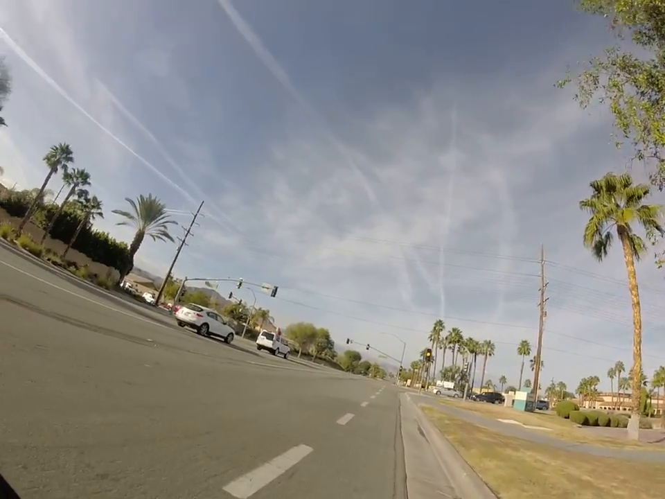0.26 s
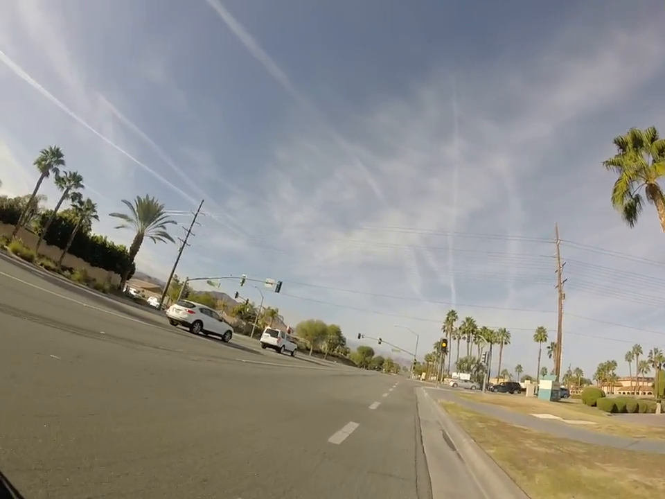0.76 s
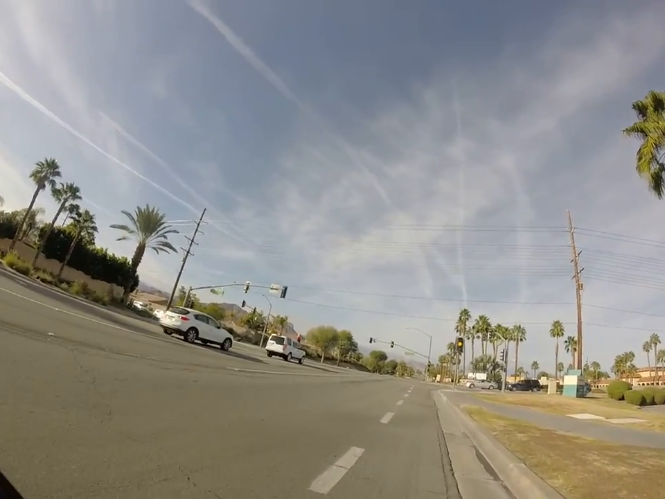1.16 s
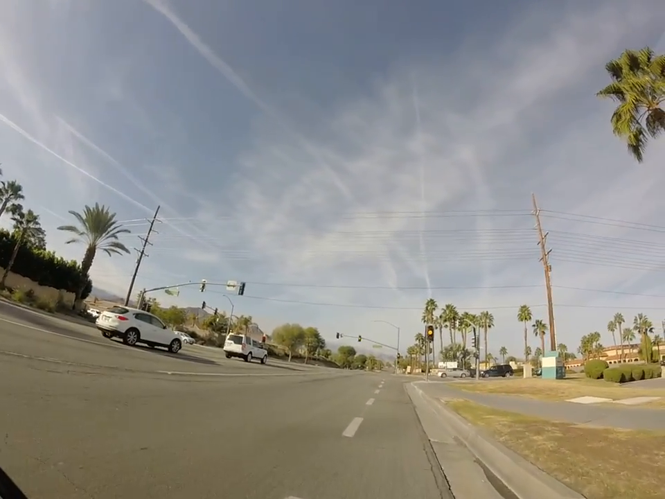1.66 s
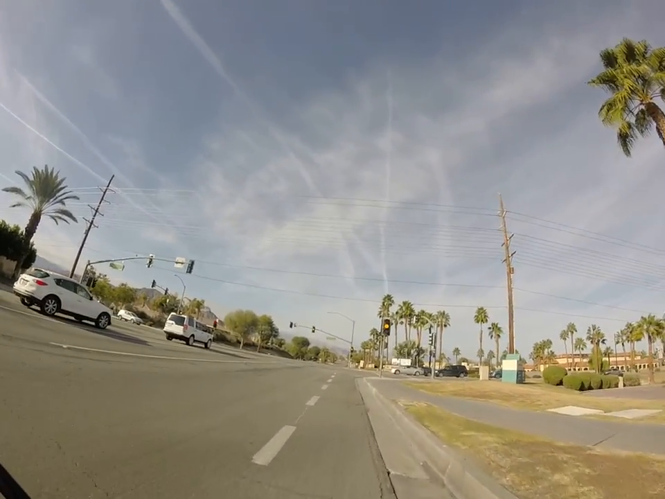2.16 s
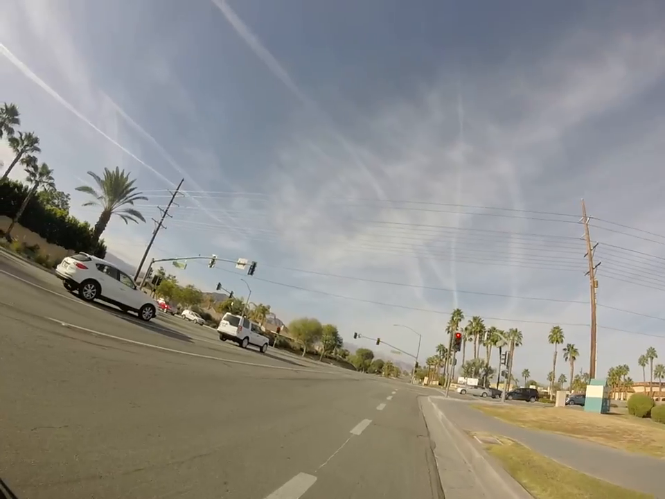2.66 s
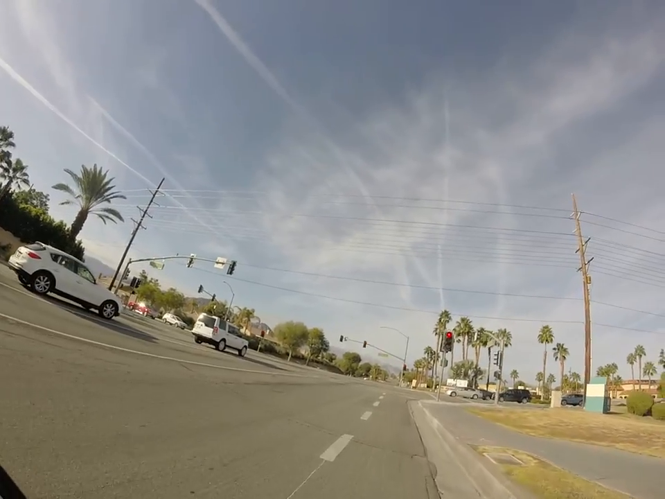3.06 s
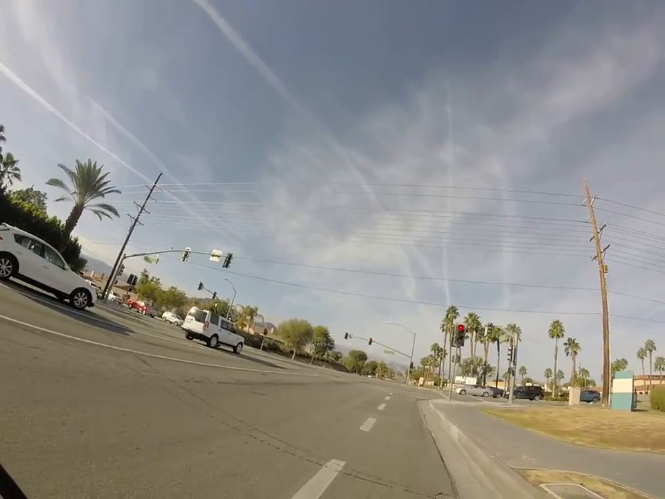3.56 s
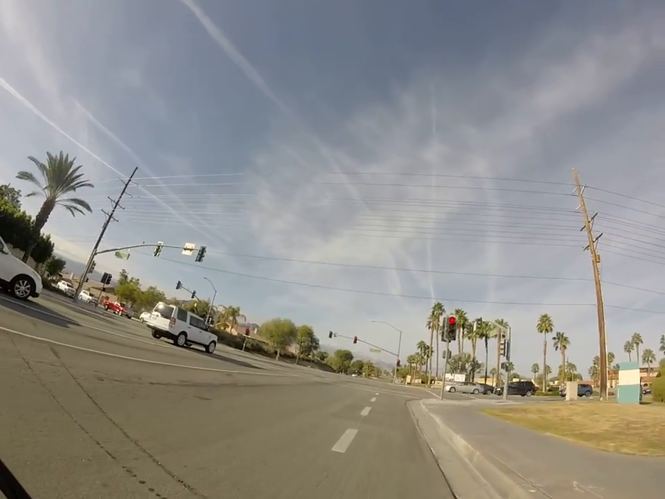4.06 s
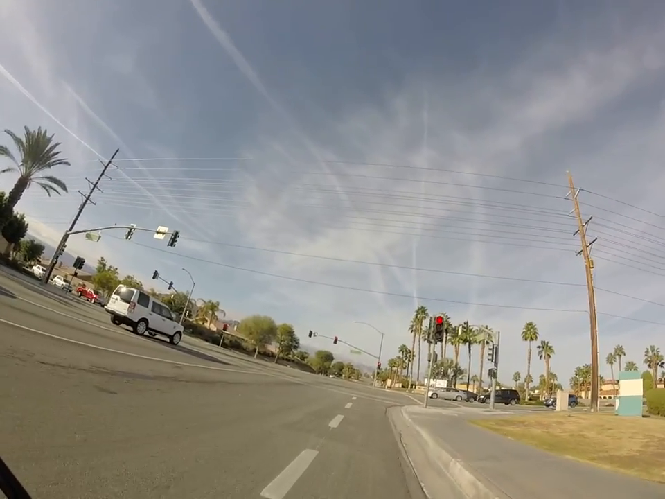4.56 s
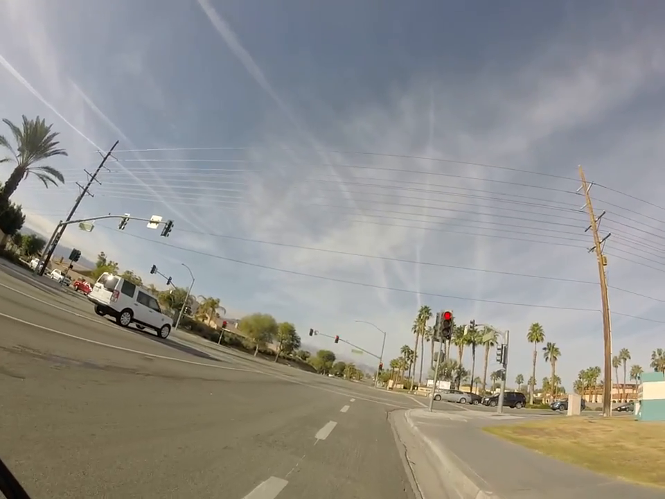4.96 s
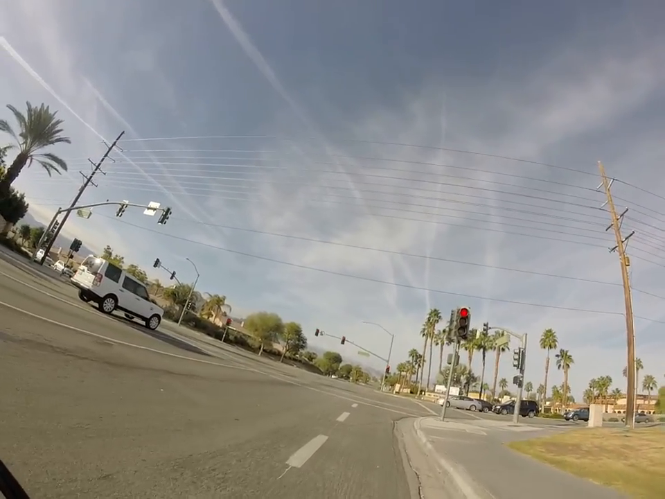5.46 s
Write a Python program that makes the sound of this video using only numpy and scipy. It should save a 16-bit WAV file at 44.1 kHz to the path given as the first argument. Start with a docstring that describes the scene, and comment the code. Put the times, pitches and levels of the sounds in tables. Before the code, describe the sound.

Heard from inside a closed camera housing on a moving bicycle, everything is close, boxy and dull in the treble. Deep wind buffeting is strongest in the first 0.2 s, then a low fluttering patter continues over faint road buzz. From 0.06 to 0.35 s a cluster of bumps gives hollow knocks and low thumps; another clear knock comes at 0.76 s, with smaller taps and brief rattles through 2.3 s. Around 2.4 s the wind falls away. A hard, ringing crack hits at 2.65 s, followed by irregular low pops and gritty rattling until 3.5 s. Knocks at 3.57 and 3.62 s, the latter with a heavy thump, lead to a short dip and smoother riding with renewed wind patter. Wind pops and a loud clack arrive about 4.6 s; then coasting freewheel ticks start, quicken, slow around 5.3 s, and quicken again near the end.

```python
"""Wind buffets and patters on the microphone port of a camera riding in a closed housing on a bicycle.
Beneath it the road buzzes through the frame: noise excites the housing modes, with gritty rattling shakes.
Bumps knock the housing, impulses ringing its modes, a bracket and a broad low panel, each with a low thump.
Late in the ride the rider coasts and the freewheel ticks, each pawl drop ringing the hub."""
import sys
import numpy as np
from scipy import signal
from scipy.io import wavfile
from scipy.ndimage import uniform_filter1d

SR = 44100
rng = np.random.default_rng(int(sys.argv[2]) if len(sys.argv) > 2 else 0)


def store_wav(level_fs):
    """Save 16-bit WAV to argv[1]."""
    pcm = np.round(np.clip(np.atleast_2d(level_fs), -1, 1) * 32767)
    wavfile.write(sys.argv[1], SR, pcm.T.astype(np.int16))


N = 251811

# Levels as heard through the ride; the wind drops out before the big bump, and the levels dip briefly
# after the bump at 3.62 s.
# Each row: time in seconds, slow buffeting in dB, eddy stream in dB, road buzz as heard in dB.
RIDE_LEVELS = [(0.0, -16.5, -31, -44.5), (0.19, -28.5, -31, -57.5), (0.3, -27, -53, -52.5),
               (0.38, -26.5, -30.5, -51), (0.86, -24.5, -27, -54), (1.52, -22, -28.5, -54),
               (2.18, -25, -28, -51), (2.331, -26.5, -33.5, -54), (2.37, -39, -74, -59),
               (2.62, -37.5, -67, -55), (2.66, -41, -38.5, -54.5), (3.52, -33.5, -42, -56.5),
               (3.6, -31, -24, -44.5), (3.66, -33.5, -39, -66.5), (3.86, -32.5, -32, -55.5),
               (4.18, -31, -29, -52.5), (4.61, -22.5, -33.5, -53.5), (4.7, -27, -30.5, -51.5),
               (5.71, -29, -34, -56.5)]
# Loudest single eddies, most while the stream is broken.
# Each row: time in seconds, level in dB, push or pull on the port.
STRONG_EDDIES = [(2.682, -21, "pull"), (2.698, -27, "pull"), (2.72, -23, "push"), (2.745, -18, "push"),
                 (2.764, -13, "push"), (2.796, -23, "pull"), (2.821, -19.5, "push"), (2.839, -18.5, "push"),
                 (2.885, -18, "push"), (2.915, -27, "pull"), (2.933, -28, "pull"), (2.951, -13.5, "push"),
                 (2.98, -28, "pull"), (3.015, -22, "push"), (3.042, -19, "pull"), (3.06, -13, "push"),
                 (3.099, -16.5, "push"), (3.108, -19, "pull"), (3.128, -19, "push"), (3.153, -20, "pull"),
                 (3.19, -26, "push"), (3.204, -19, "pull"), (3.223, -20.5, "push"), (3.25, -22, "pull"),
                 (3.286, -16, "push"), (3.328, -16, "pull"), (3.343, -20, "pull"), (3.354, -18.5, "push"),
                 (3.401, -18.5, "push"), (3.427, -19.5, "pull"), (3.452, -18, "push"),
                 (3.497, -18.5, "push"), (3.506, -14.5, "push"), (3.536, -17, "pull"), (3.607, -23, "push"),
                 (4.075, -16.5, "push"), (4.083, -16, "pull"), (4.566, -13, "push"), (4.601, -9, "push")]
# Modes of the membrane over the port. Each row: centre in Hz, nominal width in Hz, level in dB.
MEMBRANE_MODES = [(105.3, 155, -1.5), (149.2, 72, 0), (198.3, 80, -1), (319, 115, -6)]
# Modes of the housing. Each row: centre in Hz, width in Hz, level in dB.
HOUSING_MODES = [(634, 116, 8), (924, 202, 9), (1242, 95, 10.5), (1678, 265, 3), (2380, 677, 2.5),
                 (2980, 322, 4.5), (3355, 233, 1.5), (4170, 700, -7.5), (5570, 550, -7.5),
                 (7960, 510, -15.5), (10600, 1700, -34)]
# Clearest rattling shakes of the mount. Each row: start in seconds, level in dB, time scale in seconds.
MOUNT_SHAKES = [(0.095, -36.5, 0.012), (0.143, -42, 0.038), (0.36, -44.5, 0.03), (0.546, -44, 0.031),
                (1.115, -41, 0.032), (1.271, -43, 0.029), (2.128, -39, 0.0096), (2.24, -43.5, 0.036),
                (2.346, -50, 0.01), (2.438, -54, 0.013), (2.506, -47.5, 0.017), (2.56, -47, 0.033),
                (2.659, -41.5, 0.034), (2.7, -37.5, 0.016), (2.747, -40, 0.016), (2.765, -36.5, 0.028),
                (2.796, -44, 0.018), (2.846, -41.5, 0.017), (2.884, -42.5, 0.019), (2.941, -40.5, 0.011),
                (2.948, -37.5, 0.036), (2.985, -45, 0.023), (3.034, -46.5, 0.027), (3.064, -36.5, 0.027),
                (3.109, -43, 0.023), (3.155, -45, 0.016), (3.212, -47, 0.012), (3.225, -48, 0.011),
                (3.25, -40, 0.033), (3.288, -44, 0.011), (3.301, -45.5, 0.037), (3.414, -41, 0.011),
                (3.428, -40, 0.022), (3.4544, -35.5, 0.016), (3.491, -49, 0.01), (3.506, -40, 0.021),
                (3.608, -35, 0.04), (4.059, -44, 0.032), (4.308, -40, 0.022), (4.415, -43, 0.015),
                (4.567, -38, 0.064)]
# Bumps that knock the housing. Each row: time in seconds, knock strength in dB, thump strength in dB,
# spot struck.
HOUSING_KNOCKS = [(0.061, -23.5, -20, "corner"), (0.137, -24.5, -34, "back"), (0.168, -34, -14, "side"),
                  (0.206, -14.5, -2.5, "lid"), (0.234, -41, -16.5, "tip"), (0.263, -19.5, -8.5, "lid"),
                  (0.306, -12.5, -1.5, "lid"), (0.346, -25, -12, "lid"), (0.47, -36.5, -20, "back"),
                  (0.548, -34, -39, "back"), (0.558, -23.5, -28, "side"), (0.57, -51, -38, "tip"),
                  (0.611, -36, -22.5, "back"), (0.758, -13, -10, "corner"), (0.82, -39, -44, "back"),
                  (0.838, -25.5, -35, "back"), (1.3, -35.5, -22, "back"), (1.3457, -18.5, -36, "tip"),
                  (1.424, -27, -23, "back"), (1.465, -37, -17, "tip"), (1.542, -20, -20, "tip"),
                  (1.983, -20.5, -10.5, "corner"), (2.181, -21.5, -17.5, "side"), (2.332, -27, -19, "lid"),
                  (2.597, -29, -32, "back"), (2.647, -4.5, -17.5, "corner"), (3.568, -15, -15.5, "rim"),
                  (3.618, -5, 1, "corner"), (3.671, -22, -22, "back"), (3.739, -23, -18, "corner"),
                  (4.603, -37.5, -44, "back"), (4.617, -9, -2.5, "rim"), (5.194, -48, -23, "side"),
                  (5.304, -48, -32, "side"), (5.607, -41, -22, "back"), (5.63, -34, -19, "side"),
                  (5.67, -25.5, -11.5, "side")]
# Upper edges of the seven groups of housing modes, in Hz, from low to high.
GROUP_EDGES_HZ = (1100, 1450, 2100, 3200, 4900, 6500, 14000)
# Spots where the housing is struck. Each entry: levels in dB of the seven groups from low to high.
SPOT_LEVELS = {"lid": (-13.5, -12, -2, -4.5, -9, -27, -30),
               "corner": (-6.5, -11.5, 0.5, -7, -14, -9.5, -11), "back": (-3, -1.5, -7, -14, -34, -38, -38),
               "rim": (-7, 2.5, -6, -7.5, -12, -11, -21), "side": (-4.5, -5.5, -2.5, -9.5, -21, -31, -31),
               "tip": (-10, -6.5, -3.5, -2.5, -5.5, -19, -26)}
# Modes of the metal bracket and, near 333 Hz, of a broad low panel, rung by hard knocks.
# Each row: centre in Hz, width in Hz, level in dB.
BRACKET_AND_PANEL_MODES = [(1078, 26, 24), (333, 165, 24.5), (2290, 19, 21)]
# Progress of the freewheel: two wide gaps, then quick ticks, which slow while the pedals follow
# and quicken again. Each row: time in seconds, teeth passed so far.
TEETH_PASSED = [(4.6488, 0), (4.741, 2), (4.837, 6), (4.9704, 12), (4.996, 13), (5.1522, 18), (5.2265, 20),
                (5.4048, 24), (5.486, 26), (5.5202, 27), (5.7055, 33)]
# Modes of pawl and hub. Each row: centre in Hz, width in Hz, level in dB.
HUB_MODES = [(1720, 75, 6.5), (2517, 72, 8.5), (2960, 140, 1), (3370, 130, -1), (4400, 120, -5),
             (5190, 100, -5), (5360, 96, 2.5), (6030, 78, -3), (7700, 300, -13)]

# eddies a second in the steady stream and while it is broken up, and the broken span (from s, to s)
STREAM_HZ, BROKEN_HZ, BROKEN_S = 417.3, 39.6, (2.4, 3.65)
# faint shakes come by chance until the road turns smooth; FAINT_S is a time scale, the spread is +-
FAINT_COUNT, ROUGH_UNTIL_S, FAINT_S = 14, 3.6, 0.011
FAINT_DB, FAINT_SPREAD_DB = -43.5, 2
# a blow on the rim skips and touches again: s later, dB
SKIP_S, SKIP_DB = 0.00039, -1.5
# drive of the hub, its spread from tick to tick, and the spread of each mode
TICK_DRIVE_DB, TICK_SPREAD_DB, MODE_SPREAD_DB = -19.5, 1.5, 2.5
SLOW_TICK_DB = 1  # louder for each doubling of the time between teeth
SCRAPE_S = 0.004  # decay of the noisy scrape after each drop
TOP_HZ = 15100  # upper limit of the sound


def undb(db):
    """Logarithmic level: the amplitude gain of a dB value."""
    return 10 ** (np.asarray(db) / 20)


def unit(x):
    """Normalisation: scaled to rms 1."""
    return x / np.sqrt(np.mean(x ** 2))


def curve(s, value):
    """Linear interpolation: straight lines through (s, value) points, one value a sample."""
    return np.interp(np.arange(N) / SR, s, value)


def resonance(x, hz, width_hz):
    """Simple resonator: a band-pass with gain 1 at the centre."""
    b, a = signal.iirpeak(hz, hz / width_hz, fs=SR)
    return signal.lfilter(b, a, x)


def ring(x, modes):
    """Modal superposition: a sum of resonators, neighbours in opposite phase."""
    total = 0
    for k, (hz, width_hz, db) in enumerate(modes):
        total = total + (-1) ** k * undb(db) * resonance(x, hz, width_hz)
    return total


def impulses(s, size):
    """Impulsive excitation: one spike for each moment."""
    x = np.zeros(N)
    index = np.clip((np.asarray(s) * SR).astype(int), 0, N - 1)
    np.add.at(x, index, size)
    return x


def fade(x, s):
    """Exponential decay: each spike becomes a tail with time constant s."""
    return signal.lfilter([1], [1, -np.exp(-1 / (s * SR))], x)


def walk(rate):
    """Random modulation: levels held 1 / rate seconds and slewed, with rms 1."""
    hold = int(SR / rate)
    steps = np.repeat(rng.standard_normal(N // hold + 1), hold)
    return unit(uniform_filter1d(steps, hold)[:N])


def eddy(spikes, width_s, point_db):
    """Pressure of a passing vortex: each spike becomes a rounded bump plus a point of the given level."""
    t = np.arange(-600, 601) / SR
    rounded = np.exp(-(t / width_s) ** 2 / 2)
    point = np.exp(-np.abs(t) / (1.19 * width_s))
    return signal.fftconvolve(spikes, rounded + undb(point_db) * point, "same")


def wind(buffet_db, eddy_db):
    """Turbulence: slow buffeting under random eddies of either sign, which rock the port membrane."""
    buffet = resonance(resonance(rng.standard_normal(N), 36.1, 36.8), 37.0, 84.0)

    t = np.arange(N) / SR
    broken = abs(t - np.mean(BROKEN_S)) < np.ptp(BROKEN_S) / 2
    rate = np.where(broken, BROKEN_HZ, STREAM_HZ)
    arrival, side, strength = rng.random((3, N))
    size = np.sign(side - .5) * undb(-2 * np.log(1 - strength))
    # dividing by the root of the rate gives sparse and dense streams equal power
    spikes = (arrival < rate / SR) * size / np.sqrt(rate)
    push = eddy(spikes, width_s=0.0007, point_db=11.5)

    stream = 0
    for hz, width_hz, db in MEMBRANE_MODES:
        rocked = resonance(resonance(push, hz, 2 * width_hz), hz, width_hz)
        stream = stream + undb(db + 1.5 * walk(12)) * rocked
    stream = unit(stream) * undb(1.07 * walk(22))

    s, db = np.transpose([row[:2] for row in STRONG_EDDIES])
    sign = np.array([1 if row[2] == "push" else -1 for row in STRONG_EDDIES])
    pops = eddy(impulses(s, undb(db - 3.5) * sign), width_s=0.0011, point_db=-3)
    return undb(buffet_db) * unit(buffet) + undb(eddy_db) * stream + pops


def shake_envelope():
    """Transient envelope: every shake of the mount rises quickly and dies away more slowly."""
    chance = rng.random((FAINT_COUNT, 2))
    faint = [(ROUGH_UNTIL_S * a, FAINT_DB + FAINT_SPREAD_DB * (2 * b - 1), FAINT_S) for a, b in chance]
    envelope = np.zeros(N)
    for s, db, scale_s in MOUNT_SHAKES + faint:
        u = (np.arange(N) / SR - s) / max(scale_s, .005)
        envelope += undb(db) * np.clip(np.minimum(3 * u, 0.77 * (1.3 - u)), 0, 1)
    return envelope


def road(buzz_db):
    """Forced vibration: tyre grain shakes each housing mode unevenly over thin hiss; the mount rattles."""
    shakes = shake_envelope()
    grit = rng.standard_normal((2, N)) * undb(2.6 * rng.standard_normal((2, N)))

    buzz = 0
    for k, mode in enumerate(HOUSING_MODES):
        buzz = buzz + (-1) ** k * undb(1.82 * walk(60)) * ring(grit[0], [mode])
    uneven = undb(2 * walk(120) + 2 * walk(25))

    # the hiss follows the buzz at about half its change in dB
    hiss_gain = undb(-63.5 + 0.49 * (buzz_db + 54)) * undb(1.3 * walk(30))
    hiss = hiss_gain * resonance(rng.standard_normal(N), 7000, 9200)

    grains = undb(np.minimum(2.5 * rng.exponential(size=N), 9))
    crackle = grit[1] * grains * undb(2 * walk(400))
    # small loose parts hardly stir the lowest modes
    b, a = signal.butter(1, 1200, "high", fs=SR)
    body = signal.lfilter(b, a, ring(crackle, HOUSING_MODES))
    bright = undb(-11.5) * ring(crackle, [(5230, 340, 0), (7900, 1000, -16.5)])
    air = undb(-27.0) * resonance(crackle, 9700, 6000)
    rattle = unit(body + bright + air)
    return undb(buzz_db) * uneven * unit(buzz) + hiss + shakes * rattle


def knocks():
    """Impact excitation: a brief contact rings the housing; the whole camera jolts with a thump."""
    s, knock_db, thump_db = np.transpose([row[:3] for row in HOUSING_KNOCKS])
    s = s + .001  # contact comes 1 ms after the listed time
    group_db = knock_db + np.transpose([SPOT_LEVELS[row[3]] for row in HOUSING_KNOCKS])
    skip = undb(SKIP_DB) * np.array([row[3] == "rim" for row in HOUSING_KNOCKS])
    group = np.searchsorted(GROUP_EDGES_HZ, np.array(HOUSING_MODES)[:, 0])
    # hard knocks are a clean blow with one bounce, light ones a longer chatter
    hard = np.clip((knock_db + 34.0) / 14, 0, 1)
    # the more the camera is thrown about, the stronger it bounces back on its mount
    bounce = np.clip((thump_db - knock_db - 2.5) / 14, 0, .8)

    housing = 0
    for k, db in enumerate(group_db):
        size = undb(db + 26.0)  # a single spike puts little into a narrow mode
        blow = impulses(s, hard * size)
        skipped = impulses(s + SKIP_S, skip * hard * size)
        bounced = impulses(s + 0.001163, bounce * hard * size)
        chatter = undb(-40.0) * fade(fade(impulses(s, (1.15 - hard) * size), 0.00046), 0.0024)
        tail = undb(-63.5) * fade(fade(impulses(s, (1.6 - hard) * size), 0.00035), 0.0096)
        force = blow + skipped + bounced + (chatter + tail) * rng.standard_normal(N)
        # a contact that rings low modes is too soft to reach far above them
        b, a = signal.butter(2, 1.53 * GROUP_EDGES_HZ[k], fs=SR)
        force = signal.lfilter(b, a, force)
        housing = housing + ring(force, [mode for mode, g in zip(HOUSING_MODES, group) if g == k])

    # a bounce damps the bracket and the panel
    free = np.clip(1 - 7.2 * bounce, 0, 1)
    bracket_and_panel = ring(impulses(s, free * hard * undb(knock_db)), BRACKET_AND_PANEL_MODES)
    jolt = fade(fade(impulses(s, undb(thump_db)), 0.00013), 0.00098)
    thump = undb(-7.5) * resonance(jolt, 149.4, 125)
    return housing + bracket_and_panel + thump


def freewheel():
    """Ratchet excitation: a pawl drops off each tooth and rings the hub modes, never quite alike."""
    at, teeth = np.transpose(TEETH_PASSED)
    s = np.interp(np.arange(teeth[-1]), teeth, at)
    gap = np.gradient(s)
    db = TICK_DRIVE_DB + SLOW_TICK_DB * np.log2(gap / np.mean(gap))
    db = db + TICK_SPREAD_DB * rng.standard_normal(len(s))
    scatter_db = MODE_SPREAD_DB * rng.standard_normal((len(s), len(HUB_MODES)))
    scrape = rng.standard_normal(N)

    ticks = 0
    for k, mode in enumerate(HUB_MODES):
        drop = impulses(s, undb(db + scatter_db[:, k]))
        force = drop + undb(-15) * fade(drop, SCRAPE_S) * scrape
        # the frame passes each ring on without its sharp edge
        ticks = ticks + resonance(ring(force, [mode]), mode[0], mode[0] / 6)
    return ticks


def scene():
    """Superposition: everything reaches one microphone inside the housing."""
    s, *columns = np.transpose(RIDE_LEVELS)
    buffet_db, eddy_db, buzz_db = (curve(s, column) for column in columns)
    mix = wind(buffet_db, eddy_db) + road(buzz_db) + knocks() + freewheel()
    return mix[None]


def record(dry):
    """Transmission: the wall dulls treble, the capsule drops the deepest bass, full scale clips."""
    b, a = signal.butter(1, 6000, fs=SR)
    wall = signal.lfilter(b, a, dry)
    b, a = signal.butter(1, 24, "high", fs=SR)
    capsule = signal.lfilter(b, a, wall)
    band_limit = signal.ellip(8, .2, 70, TOP_HZ, fs=SR, output="sos")
    return signal.sosfilt(band_limit, np.clip(capsule, -1, 1))


dry = scene()
out = record(dry)
store_wav(out)
```